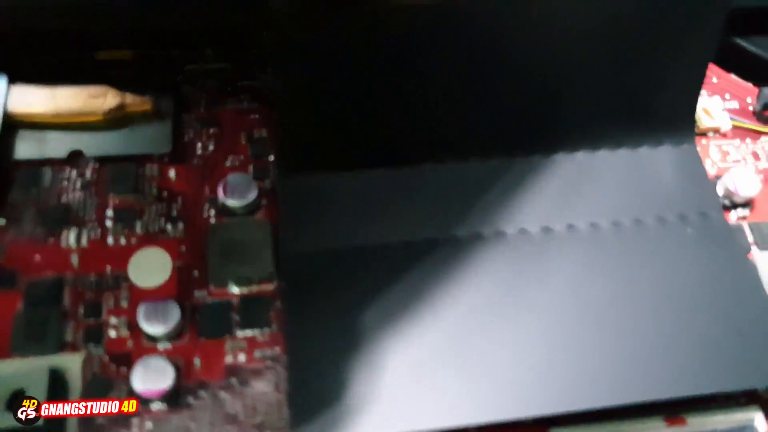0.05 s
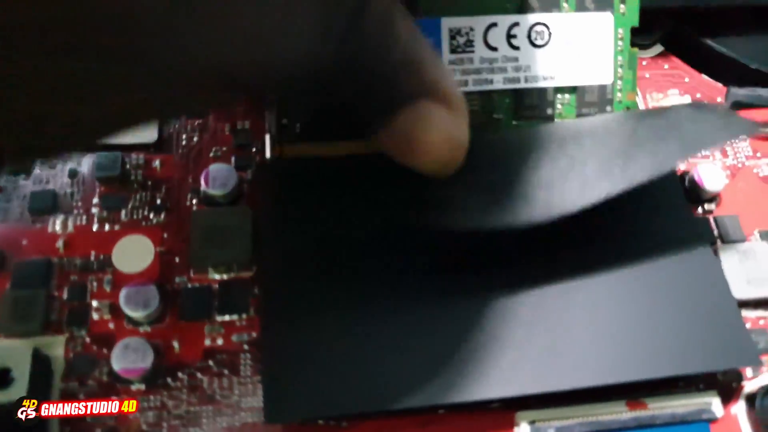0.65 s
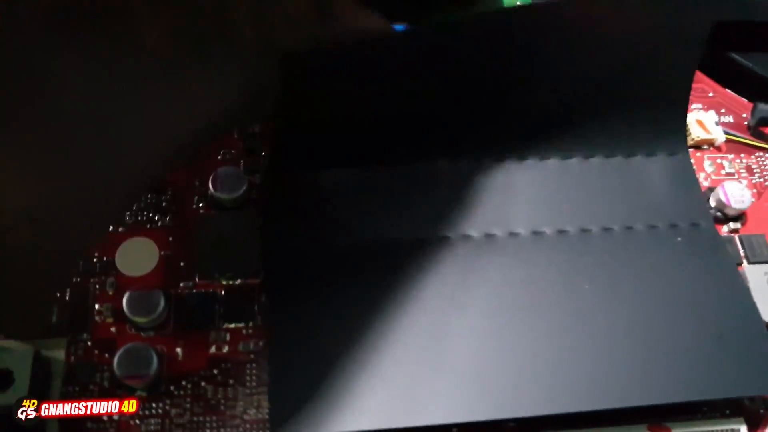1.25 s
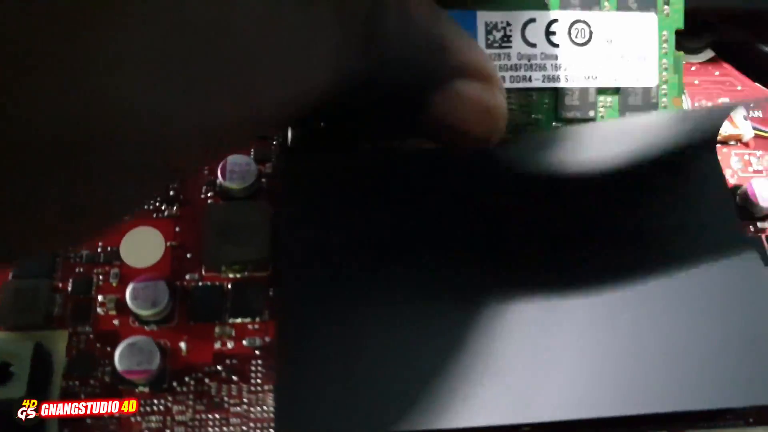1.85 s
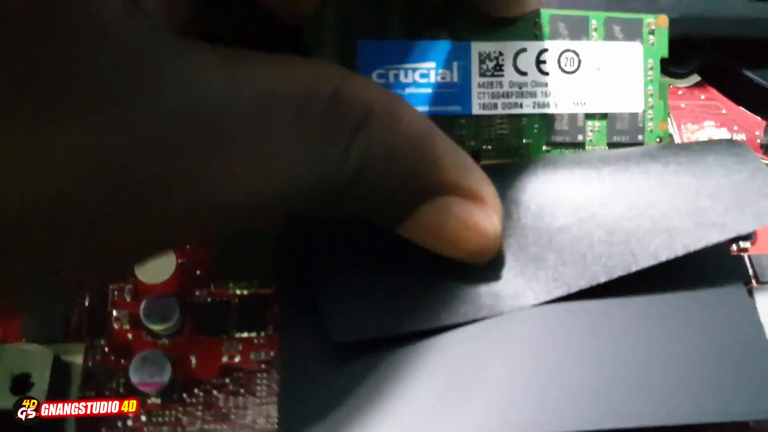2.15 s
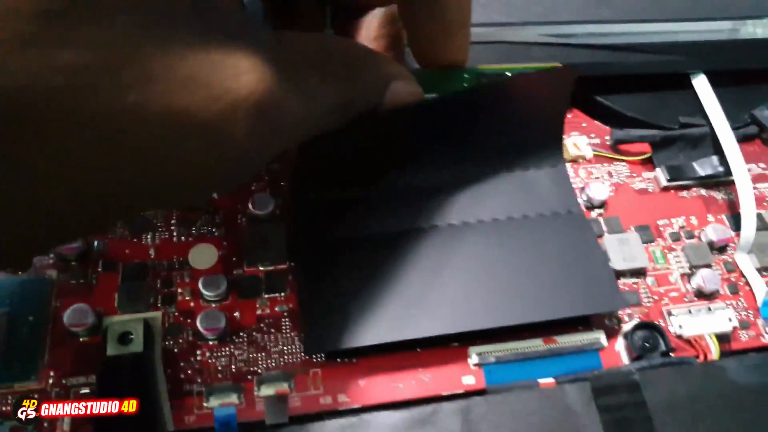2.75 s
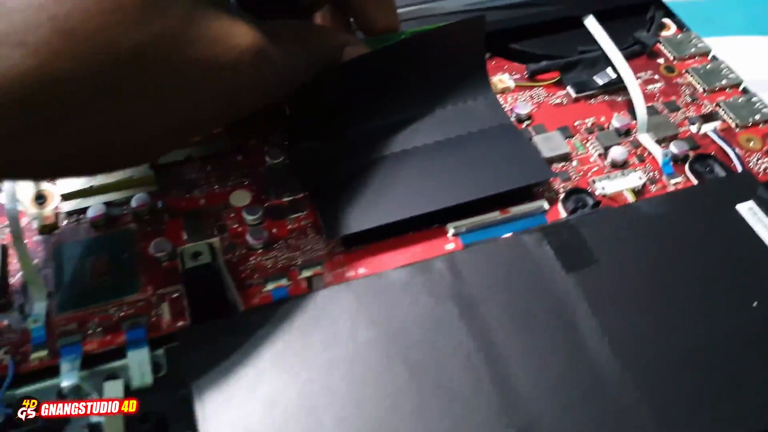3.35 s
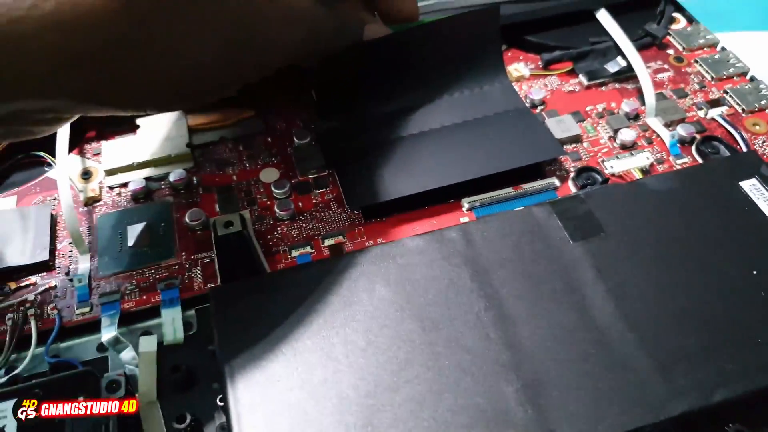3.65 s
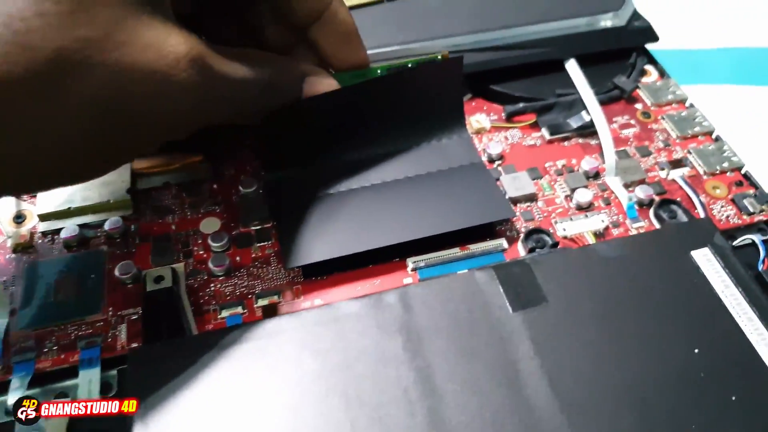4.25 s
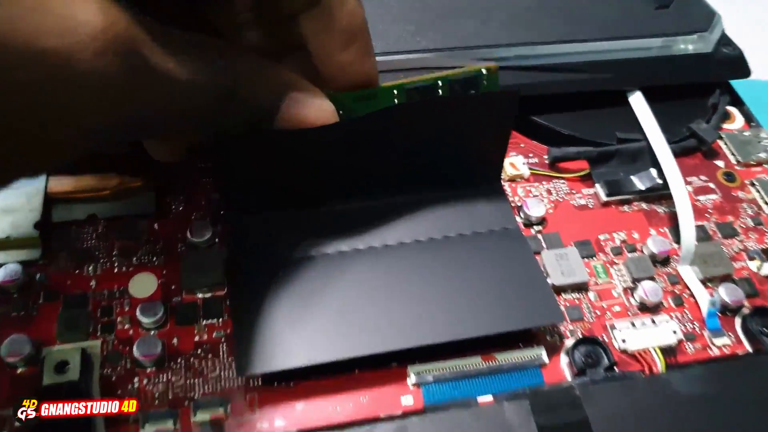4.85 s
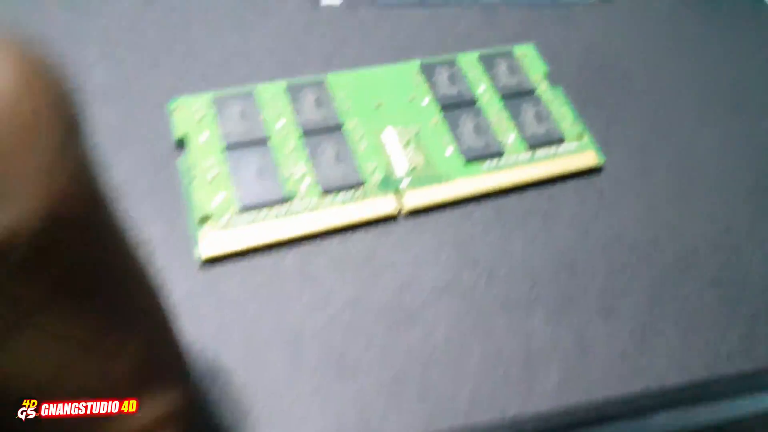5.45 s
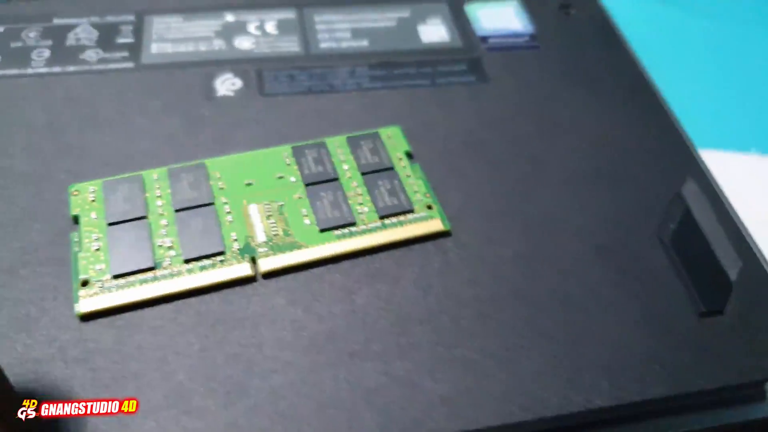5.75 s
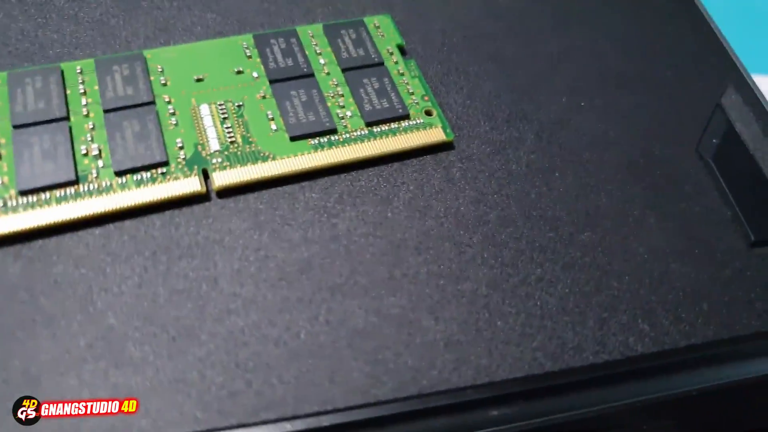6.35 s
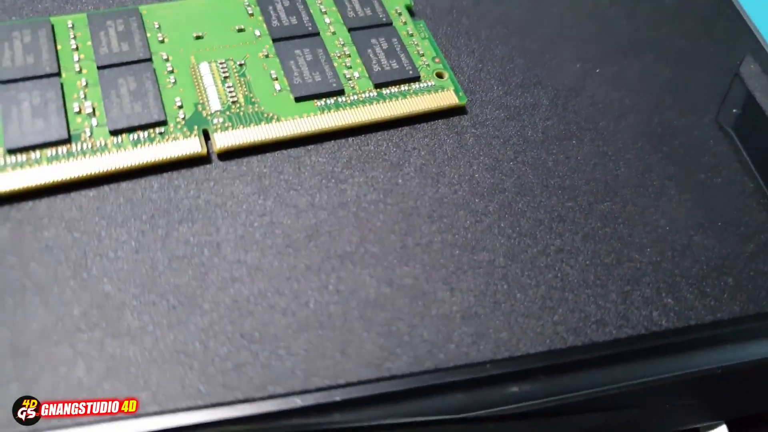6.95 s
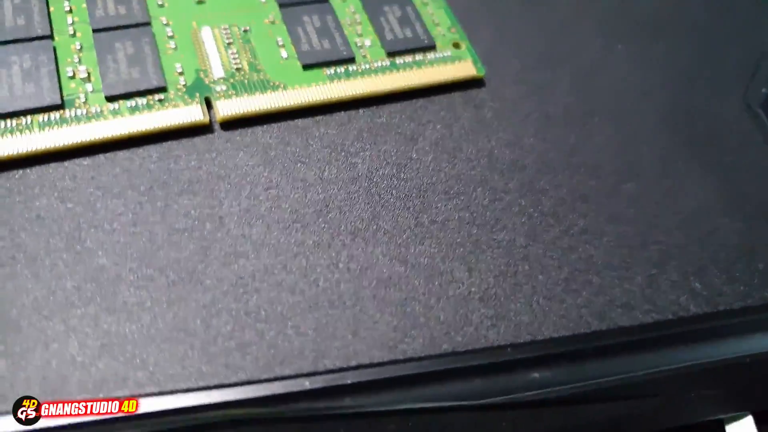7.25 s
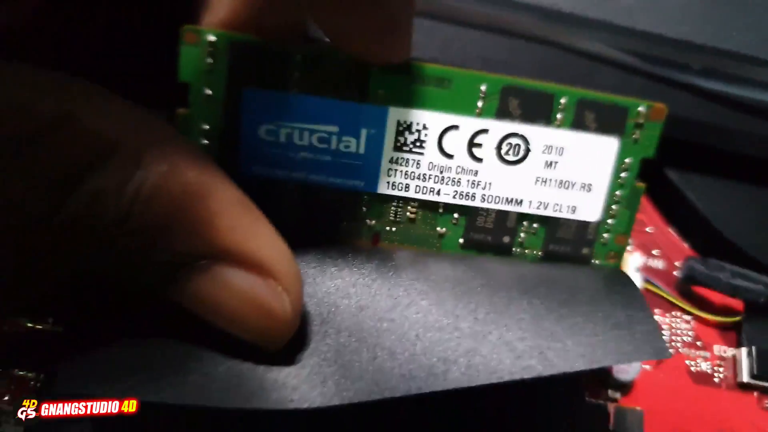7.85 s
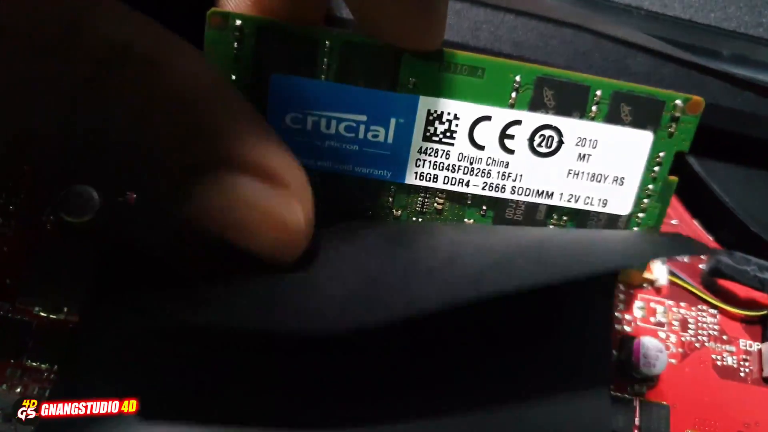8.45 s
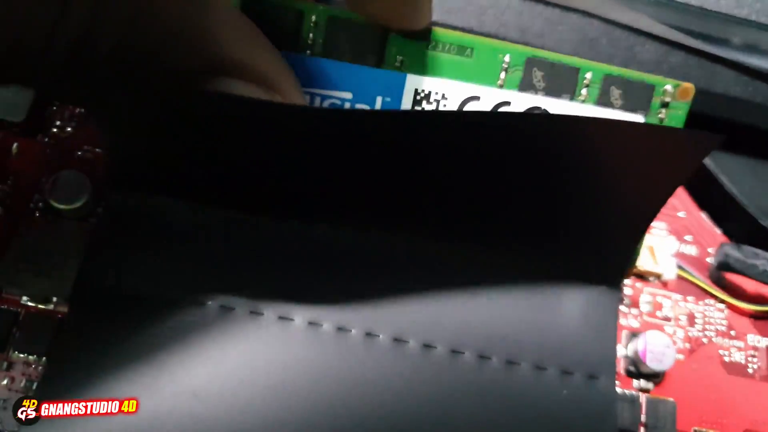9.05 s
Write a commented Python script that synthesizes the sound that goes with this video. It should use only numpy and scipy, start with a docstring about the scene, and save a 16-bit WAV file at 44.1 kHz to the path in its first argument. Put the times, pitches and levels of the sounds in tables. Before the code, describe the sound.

Light knocks and rubs on an open laptop's plastic casing begin the sound. From 0.5 to 1 second a stiff, thin plastic sheet buckles and snaps against a memory module in a flurry of bright clicks. Softer crinkles follow from 1.5 to 2.2 seconds and again around 2.8. It is then quiet, with faint finger brushing and stray ticks, until a small creak at 4.5. Dull knocks and short, grainy rubs come between 5 and 6 seconds. The sharpest knock lands at about 6.6, followed by lighter knocks, creaks and soft thumps until 7.8. More rubs and a knock come between 8 and 8.7, then a small snap and a low puff of air on the left of the microphone at 9. Throughout, the close hand-held microphone carries low handling rumble and faint steady hiss, and a small room adds a short echo.

```python
"""A stiff plastic sheet in an open laptop is bent back and snaps against a memory module: each buckle
is a burst of slips ringing the sheet's bright modes. The casing knocks and creaks in the grip, and
fingers and module slide over plastic in short, grainy rubs. Underneath are soft thumps, the rumble of
the hand through a close hand-held camera and a faint steady hiss. A small room answers the contacts."""
import sys
import numpy as np
from scipy import signal
from scipy.fft import rfft, irfft, next_fast_len
from scipy.io import wavfile
from scipy.ndimage import uniform_filter1d, map_coordinates

SR = 44100
rng = np.random.default_rng(int(sys.argv[2]) if len(sys.argv) > 2 else 0)


def store_wav(level_fs):
    """Save 16-bit WAV to argv[1]."""
    pcm = np.round(np.clip(np.atleast_2d(level_fs), -1, 1) * 32767)
    wavfile.write(sys.argv[1], SR, pcm.T.astype(np.int16))


N = 401751
SIZE, MARGIN = 16384, 2048  # samples in one contact's buffer, and of those before its onset
HIT_SPAN_S = .01  # a hit's energy is spread over this time to set its levels
T = np.maximum(np.arange(SIZE) - MARGIN, 0) / SR  # seconds since the onset
HZ = np.fft.rfftfreq(SIZE, 1 / SR)
GATE = (T > 0) * signal.get_window(("tukey", .2), SIZE)  # opens at the onset

# Edges in Hz of the four bands that voice a contact: body, mid, ring and air.
BAND_EDGES = [300, 1400, 3500, 8000, 16000]
# Snaps of the sheet. Each row: start in seconds, 60 dB decay time in seconds, body, mid, ring and air
# levels in dB, leftward pan in dB.
SHEET_SNAPS = [(0.5158, 0.061, -61, -59, -52, -60, -3.5), (0.565, 0.035, -38.5, -36.5, -17.5, -26.5, -1.5),
               (0.646, 0.03, -38.5, -42.5, -35.5, -41, -0.5), (0.659, 0.042, -44, -44, -43.5, -52, -5),
               (0.6776, 0.045, -34.5, -31, -22, -28, -2), (0.729, 0.045, -42.5, -36, -33, -31, -2),
               (0.7412, 0.042, -39, -25, -18.5, -18, -5.5), (0.7462, 0.035, -38, -47, -19.5, -24.5, 5.5),
               (0.9702, 0.06, -53.5, -55.5, -54.5, -64.5, -2), (1.5106, 0.033, -74, -67, -51.5, -57, -5),
               (1.571, 0.014, -63, -62, -47, -48.5, -6.5), (1.591, 0.025, -65, -60, -42.5, -45, -4.5),
               (1.6558, 0.018, -76, -67, -51.5, -58.5, -4), (1.7056, 0.038, -55, -52.5, -30.5, -39, -4),
               (1.7084, 0.031, -48, -58, -46, -40.5, 3), (1.723, 0.022, -68, -60, -46, -46.5, -2.5),
               (1.8706, 0.03, -51, -58, -36, -41.5, -6), (1.958, 0.047, -38, -34, -27, -34.5, -3.5),
               (2.1416, 0.024, -77, -53.5, -53.5, -57, -1), (2.159, 0.033, -75, -54.5, -56.5, -60, -1),
               (2.6955, 0.054, -61, -46, -48, -46, 1), (2.7495, 0.12, -52, -54, -48.5, -49, -1.5),
               (2.8239, 0.059, -50.5, -41, -33.5, -38.5, -1), (2.851, 0.049, -49, -43.5, -41.5, -48, -3.5),
               (3.188, 0.03, -70, -86.5, -68.5, -61, -5), (4.4255, 0.066, -58.5, -49, -53.5, -68, 0),
               (5.2399, 0.063, -45, -46.5, -43, -43.5, 0.5), (6.0409, 0.04, -60, -56, -47, -48.5, 4),
               (7.046, 0.035, -47, -53, -62.5, -56, -0.5), (8.9177, 0.072, -51.5, -57.5, -50.5, -50, 7.5)]
# Knocks on the casing. Each row: start in seconds, body, mid, ring and air levels in dB, leftward pan
# in dB, chatter in dB.
CASING_KNOCKS = [(0.225, -35, -46.5, -47, -54.5, -1, -7), (0.3342, -41, -51.5, -59, -62, -5.5, -0.5),
                 (0.3643, -38, -39.5, -51.5, -53, -3, -4.5), (0.385, -43, -62.5, -50, -56, 0.5, -12),
                 (1.106, -48.5, -58, -71.5, -72, 4, -0.5), (1.128, -52.5, -50.5, -58, -75.5, -2.5, -4.5),
                 (2.219, -63, -65, -74.5, -71.5, 0, 3), (2.3838, -60, -69, -87, -78, -4, -6),
                 (4.656, -67.5, -66, -63, -64.5, 4, -1), (4.8836, -54.5, -69, -64, -65, 4, 2),
                 (4.9924, -30, -38, -55, -63, 1, -14), (5.3913, -32.5, -40, -76, -47.5, 1, -9.5),
                 (5.396, -44, -51, -61.5, -54.5, 2.5, -8), (6.567, -33.5, -41.5, -36.5, -43, -2.5, -8),
                 (6.575, -23, -31, -36, -26, 5, -9), (6.825, -32, -45, -45, -43, 2, -1.5),
                 (6.8869, -46, -49, -56.5, -51.5, 0.5, 0), (6.9766, -34.5, -42.5, -51.5, -42.5, 3, 9.5),
                 (7.1502, -28.5, -41, -39.5, -31.5, 0, 2.5), (7.1562, -54, -34.5, -52, -40.5, -0.5, -10),
                 (7.2311, -33.5, -41.5, -55, -55, 0.5, -7.5), (7.468, -45, -41, -57.5, -48, 5.5, -7.5),
                 (7.591, -40, -44.5, -49, -55, 7, 14), (7.603, -35, -46, -51.5, -71.5, 2.0, 7),
                 (7.756, -55, -64, -63, -74, 11, 4), (8.1915, -41.5, -64.5, -71, -67, 3, 2.5),
                 (8.6196, -34, -43, -74, -58, 6.5, -8.5), (8.672, -52, -69, -63, -65.5, 4, 0)]
# Sliding strokes. Each row: peak time, rise and fall in seconds, body, mid, ring and air levels in dB,
# leftward pan in dB, lag of the lows in seconds per octave, ratio of crackle to hiss.
RUB_STROKES = [(.09, .05, 0.07, -50.5, -55.5, -54.5, -60, 0, .001, .8),
               (.222, .03, 0.046, -63, -68, -63.5, -62.5, 0.5, .001, .6),
               (.35, .025, 0.06, -48, -55.5, -55, -61, -1.5, .001, 1.2),
               (.65, .06, 0.016, -48.5, -53, -51, -50, -5.5, .001, 1.3),
               (.765, 0.022, 0.074, -53.5, -44.5, -51, -54, -5, .001, .4),
               (1.338, .023, 0.04, -56, -45.5, -45.5, -44, -3, .006, .4),
               (1.385, .03, .06, -61.5, -69, -55, -62.5, -4.5, .001, .4),
               (1.6, 0.038, 0.054, -72.5, -68, -56.5, -61, -1, .001, 6),
               (1.712, 0.033, .07, -60, -60.5, -69, -53.5, 1, .012, 1.3),
               (1.9, .024, 0.07, -61, -61, -58.5, -56, -1, 0.00066, .6),
               (2.02, .062, .1, -52.5, -48, -49, -55, -2, .001, 0.72),
               (2.704, .02, 0.089, -73.5, -65, -61, -64, -1.5, .001, 0.89),
               (2.934, 0.062, 0.15, -58, -59.5, -60.5, -54, -2.5, .001, 0.41),
               (3.06, .06, 0.18, -70, -83.5, -75, -63, -1, .001, .4),
               (3.31, .12, 0.16, -81, -87, -81, -64.5, -0.5, .001, 0.31),
               (3.49, .1, 0.17, -88, -84, -76.5, -69, -0.5, 0.0011, .4),
               (4.41, .08, 0.15, -72.5, -76.5, -76, -73.5, 0, 0.0013, 0.51),
               (4.54, 0.055, 0.088, -60, -59.5, -60, -56, 1.5, .001, .65),
               (4.985, .031, .039, -55, -51, -51, -50.5, 3, 0.0044, .9),
               (5.019, .027, 0.156, -60.5, -67, -74.5, -69, 0, 0.00092, 1),
               (5.195, .08, 0.061, -54.5, -60, -54, -56, 0.5, .001, .9),
               (5.285, .05, 0.05, -50, -46.5, -48, -53.5, -0.5, .001, 1.6),
               (5.385, 0.077, 0.051, -52.5, -57.5, -59, -59.5, -2.5, .001, .9),
               (5.868, .024, 0.039, -53.5, -47.5, -46.5, -49.5, 1, .008, 0.39),
               (5.9, .025, .04, -63, -51.5, -47, -54, -1.5, .003, .7),
               (6.06, .02, 0.14, -61, -56, -58.5, -61.5, 0.5, 0.0011, .4),
               (6.12, .03, .051, -52.5, -48.5, -48, -52.5, 4.5, .001, .35),
               (6.41, 0.055, 0.057, -63.5, -78.5, -80, -69.5, 5, 0.0011, .6),
               (6.559, .016, 0.0175, -56.5, -52, -52, -55.5, 6.5, .006, .4),
               (6.59, 0.011, 0.2, -51, -60, -62, -58, 0, 0.00089, 0.36),
               (6.815, .07, .052, -48.5, -59, -60.5, -67.5, 7, 0.0011, 0.7),
               (6.985, .02, .06, -56, -62, -64.5, -60, 1, .001, .6),
               (7.17, .015, .045, -47, -61, -58.5, -63, 1, .001, .4),
               (7.224, .025, 0.0391, -53.5, -54.5, -55.5, -59, 3, 0.0008, 0.63),
               (7.598, .039, 0.048, -50.5, -61, -58.5, -57, 4.5, .001, 1.3),
               (7.655, 0.049, 0.073, -49.5, -54, -56, -64, 5.5, .001, 0.93),
               (7.799, .03, 0.097, -57, -73, -81, -79, 4.5, 0.00092, 1),
               (8.14, .03, 0.08, -53.5, -53.5, -50, -56, 3, .008, 0.345),
               (8.355, .044, .091, -56, -56, -55, -59, 3, .001, .65),
               (8.58, .045, 0.085, -54, -55, -52, -59, 5, .011, 0.44),
               (8.89, .07, .14, -61, -66.5, -64.5, -64, 4, 0.0011, 1)]
# Friction catching a resonance. Each row: start and end in seconds, first and last pitch in Hz, ratio
# of pitch to bandwidth, level in dB.
CREAKS = [(0.081, 0.138, 534, 558, 6, -46.5), (0.073, .14, 1000, 1120, 4, -53.5),
          (0.326, 0.391, 681, 611, 8.7, -47.5), (0.63, 0.66, 1150, 1183, 8.6, -47),
          (1.346, 1.368, 1000, 437, 3.1, -49), (1.464, 1.65, 4440, 5180, 3.6, -70),
          (1.665, 1.725, 4960, 5320, 3.6, -55), (1.854, 1.932, 5400, 5600, 4.8, -57),
          (1.985, 2.048, 1535, 1510, 12, -49.5), (2.342, 2.683, 924, 1122, 3.04, -71.5),
          (2.352, 2.655, 364.6, 328, 2.4, -64), (2.688, 2.742, 1280, 1247, 4.7, -53),
          (2.921, 2.945, 434, 457, 5, -48.5), (3.437, 3.54, 3550, 3510, 4, -75.5),
          (4.368, 4.416, 732, 764, 5, -67.5), (4.503, 4.579, 1217, 1193, 5.1, -50.5),
          (4.784, 4.86, 1095, 1230, 1.6, -67.5), (5.053, 5.188, 3600, 3470, 81, -67),
          (5.237, 5.273, 379.7, 350, 7.9, -47), (6.049, 6.127, 520, 573, 6.9, -49.5),
          (6.568, 6.584, 1080, 1062, 8, -35), (6.593, 6.67, 800, 722, 3, -54),
          (7.405, 7.44, 2110, 2020, 7, -60), (7.619, 7.726, 507, 458, 3.4, -51.5),
          (8.33, 8.42, 479, 467, 15, -54.5), (8.336, 8.409, 1766, 1636, 3.8, -55.5),
          (8.559, 8.619, 1800, 1595, 4.5, -51.5)]
# Soft low thumps; the last two are puffs of air on the left microphone. Each row: start in seconds,
# pitch in Hz, level in dB, 60 dB decay time in seconds, leftward pan in dB.
LOW_THUMPS = [(.005, 70, -37.5, 0.25, 0), (.237, 69, -34, 0.23, 2), (.37, 71.4, -35.5, 0.12, 2.5),
              (0.573, 187, -30, 0.059, 4), (0.6745, 207, -13, 0.022, 5.5), (0.743, 288.6, -27, 0.03, -1.5),
              (0.876, 78.5, -27.5, 0.13, 1.5), (1.105, 67, -36.5, 0.36, 10), (1.8695, 273, -18, 0.021, 11),
              (1.936, 84.7, -37.5, 0.24, 4), (2.05, 66.6, -35, 0.18, 2), (4.644, 79.5, -41, 0.21, 3),
              (4.993, 73, -38.5, 0.46, 1), (5.556, 69.4, -34.5, 0.18, 3), (5.913, 80, -37, 0.12, 7),
              (6.579, 110, -33, 0.085, 9), (6.806, 69, -28, 0.29, 3.5), (7.172, 69.7, -25, .2, 5),
              (7.611, 68.1, -26, 0.18, 6), (7.231, 217, -33.5, 0.046, 3), (7.796, 101.5, -29, 0.052, 1.5),
              (8.211, 91, -34.5, 0.12, 1), (8.973, 81, -28, 0.5, 45.5), (9.044, 65.5, -22.5, 0.2, 48.5)]
# Resonances of the sheet and of the casing. Each row: frequency in Hz, width in Hz, level in dB.
SHEET_MODES = [(1300, 450, -12), (2090, 99, -14), (2850, 280, -11.5), (4200, 400, -3.5), (4900, 860, 1),
               (5940, 260, -4.5), (8750, 220, -10.5), (9313, 300, -5.5), (10500, 680, -7.5),
               (13180, 210, -15)]
CASING_MODES = [(672, 170, 1), (870, 61, -3), (1117, 130, -1.5), (1476, 170, -3), (2084, 360, -2),
                (2440, 430, -20), (3716, 450, -16), (6096, 680, -19.5), (9640, 2400, -12),
                (11600, 1300, -16)]
# Tone curves of a rub, a thump's dull noise, the grip's rumble, three layers of skin brushing and the
# background hiss. Each row: frequency in Hz, level in dB.
RUB_EQ = [(150, -39), (280, -5), (450, -3), (650, -4), (850, -7), (1200, -0.5), (2200, 3), (3300, -3.5),
          (4400, -4.5), (5800, -11), (7700, -17.5), (9400, -9), (11800, -10.5), (16000, -19.5)]
THUMP_EQ = [(40, -22), (110, 5.5), (190, -6), (300, -21), (700, -48.5), (2000, -100)]
RUMBLE_EQ = [(15, -41.5), (28, -21), (45, 4.5), (68, -4), (100, -1), (135, -9.5), (200, -13), (320, -26.5),
             (600, -45.5), (1500, -100)]
BRUSH_BODY_EQ = [(120, -34), (250, 3.5), (600, -1.5), (1100, -10), (2200, -21.5), (5000, -52)]
BRUSH_RING_EQ = [(800, -17), (2000, 1), (5000, -4), (7500, -10.5), (10000, -31)]
BRUSH_AIR_EQ = [(6000, -31), (8500, -6), (10500, -1), (13000, 0), (16000, -9.5)]
HISS_EQ = [(20, 22), (45, 32), (75, 18.5), (200, 9), (400, 1), (1000, -4.5), (2600, -4), (7500, -19.5),
           (12000, -6), (16000, -10.5)]
# Fader rides for the grip's rumble and the fingers' brushing. Each row: time in seconds, level in dB.
GRIP_RIDE = [(0, -54), (.5, -57), (.8, -54), (1.15, -47), (1.5, -56), (2.0, -54.5), (2.5, -61.5),
             (2.95, -52), (3.3, -62), (4.15, -66), (4.55, -63), (5.0, -55.5), (5.4, -48.5), (5.8, -64.5),
             (6.35, -56), (7.25, -52), (8.0, -55.5), (9.11, -56.5)]
FINGER_RIDE = [(0, -58), (.46, -70), (.72, -53.5), (1.25, -73), (1.9, -62.5), (2.3, -74.5), (2.65, -72),
               (2.95, -64), (3.75, -79.5), (4.3, -76), (4.9, -66), (5.2, -57), (5.72, -73.5), (6.5, -72.5),
               (6.8, -63.5), (7.7, -69.5), (8.0, -74.5), (9.11, -73)]
# The small room's decay. Each row: frequency in Hz, 60 dB decay time in seconds.
ROOM_DECAY = [(150, 0.13), (1000, 0.37), (4000, 0.39), (8000, 0.34), (12000, 0.39)]
# Balance of the two microphone ports. Each row: frequency in Hz, left over right in dB.
PORT_BALANCE = [(60, 6), (250, 10), (700, 8.8), (2200, 9), (5000, 2.5), (10000, 1), (14000, -2.5)]
# Phase between the ports. Each row: frequency in Hz, lead of the left in radians.
PORT_PHASE = [(100, 0.15), (450, 0.89), (900, 1.3), (2000, 2.4), (3300, 1.9), (5000, 1.9), (8000, 0.53),
              (12000, 0)]
# Likeness of the ports. Each row: frequency in Hz, coherence from 0 to 1.
PORT_COHERENCE = [(80, 0.7), (300, 0.71), (900, 0.816), (2500, .27), (5000, 1), (8000, 0.87), (13000, 0.82)]


def sheet_snaps(rise_s=.0005, hold_s=.0053, unrung_db=-11):
    """A faint noise swells just before each snap, then a burst rings the sheet's dense modes."""
    out = np.zeros((2, N))
    tone = causal(eq_gain([(100, -10.5), (300, 2.5), (12000, -5), (16000, -16.5)]))
    for start, t60, *levels_db, pan_db in SHEET_SNAPS:
        buckle = amp(-60 * (np.hypot(T, hold_s) - hold_s) / t60) * (1 - np.exp(-T / rise_s))
        envelope = lead_in(db=-24, t60=.015) + buckle
        sheet = resonate(SHEET_MODES, detune=.008, scatter_db=2) + amp(unrung_db)
        burst = rfft(envelope * rng.standard_normal((2, SIZE)))
        add(out, start, voiced(burst * sheet * tone, levels_db, pan_db, HIT_SPAN_S))
    return out


def sheet_ticks(count=40, spread_db=3, cap_db=-66, t60=.03):
    """Tiny stray contacts tick on the sheet at random, stronger where the fingers are busy."""
    out = np.zeros((2, N))
    busy_db = ride(FINGER_RIDE)
    for moment, strength, brightness in rng.random((count, 3)):
        onset = int(moment * N)
        level_db = min(busy_db[onset], cap_db) + spread_db * (2 * strength - 1)
        slip = rfft(GATE * amp(-60 * T / t60) * rng.standard_normal((2, SIZE)))
        sheet = resonate(SHEET_MODES, detune=.05, scatter_db=4)
        colour_db = np.array([3, -1, -7, -10]) + np.array([-8, -3, 2, 3]) * brightness
        add(out, onset / SR, voiced(slip * sheet, level_db + colour_db, 0, HIT_SPAN_S))
    return out


def casing_knocks(chatter_t60=.044, rattle_t60=.048, unrung_db=-24):
    """One blow rings the damped casing; the contact chatters and loose parts rattle briefly."""
    out = np.zeros((2, N))
    tone = causal(eq_gain([(100, -7), (400, -2), (700, 5), (12500, .5), (16000, -10.5)]))
    for start, *levels_db, pan_db, chatter_db in CASING_KNOCKS:
        chatter = amp(chatter_db - 11 - 60 * T / chatter_t60)
        rattle = amp(-35 - 60 * T / rattle_t60)
        blow = GATE * rng.standard_normal((2, SIZE)) * (chatter + rattle)
        blow[0, MARGIN] += 2  # the impact itself
        swell = rng.standard_normal((2, SIZE)) * lead_in(db=-24, t60=.016)
        casing = resonate(CASING_MODES, detune=.025, scatter_db=2) + amp(unrung_db)
        add(out, start, voiced(rfft(blow + swell) * casing * tone, levels_db, pan_db, HIT_SPAN_S))
    return out


def rubs(casing_db=-1, flutter_db=2):
    """Skin and module slide over matt plastic: fine slips swell and fade, coloured by the casing."""
    out = np.zeros((2, N))
    octaves_down = np.clip(np.log2(3000 / (HZ + 1)), -1, 3)
    for peak, rise, fall, *levels_db, pan_db, lag, crackle in RUB_STROKES:
        speed = np.interp(T, np.cumsum([0, rise, fall]), [0, 1, 0])
        flutter = amp(flutter_db * jitter(smooth_samples=300))
        pressure = np.sin(speed * np.pi / 2) ** 1.4 * (1 + speed) * flutter
        # a slowing stroke hisses in the treble first and in the lows last
        slowing = np.exp(-2j * np.pi * np.cumsum(lag * octaves_down) * HZ[1])
        roughness = patchy(rng.standard_normal((2, SIZE)), depth_db=4.5)
        hiss = rfft(pressure * roughness) * slowing
        slips = rfft(pressure * grains(per_second=1400, spread_db=3))
        casing = resonate(CASING_MODES, detune=.07, scatter_db=3)
        colour = causal(eq_gain(RUB_EQ)) * (1 + amp(casing_db) * casing)
        add(out, peak - rise, voiced((hiss + crackle * slips) * colour, levels_db, pan_db, rise + fall))
    return out


def creaks(pan_db=-2):
    """Uneven sticking and slipping keeps one resonance going: a narrow, gliding band of noise."""
    out = np.zeros((2, N))
    for start, end, first_hz, last_hz, sharpness, db in CREAKS:
        width_hz = first_hz / sharpness
        span = np.clip(end - start, .01, T[-1])
        progress = np.minimum(T / span, 1)
        phase = 2 * np.pi * np.cumsum(first_hz + (last_hz - first_hz) * progress) / SR
        drive = irfft(rfft(rng.standard_normal((2, 2, SIZE))) / (1 + (2 * HZ / width_hz) ** 2))
        swell = np.abs(np.sin(np.pi * progress)) ** .5
        tone = (drive[0] * np.cos(phase) + drive[1] * np.sin(phase)) * swell
        tone = irfft(ports(rfft(tone), HZ, pan_db))
        add(out, start, tone * amp(db) * np.sqrt(span * SR) / np.linalg.norm(tone.mean(0)))
    return out


def thumps(rise_s=.0035, waver_depth=.12, noise_db=-11):
    """A soft low thump swings for a few cycles at a wavering pitch, with a little dull noise."""
    out = np.zeros((2, N))
    for start, hz, db, t60, pan_db in LOW_THUMPS:
        waver = np.exp(waver_depth * jitter(smooth_samples=400))
        swing = np.sin(2 * np.pi * hz * np.cumsum(GATE * waver) / SR)
        noise = unit(irfft(rfft(rng.standard_normal(SIZE)) * eq_gain(THUMP_EQ)))
        envelope = amp(db - 60 * T / t60) * (1 - np.exp(-T / rise_s))
        sides = amp([[pan_db / 2], [-pan_db / 2]])
        add(out, start, (swing + amp(noise_db) * noise) * envelope * sides / sides.mean())
    return out


def grip_rumble(effort, effort_db=-2, lumps_db=2):
    """The moving hand rumbles through the camera in lumps, swelling around every stroke."""
    rumble = stereo_noise(RUMBLE_EQ, pan_db=-5)
    power = np.abs(uniform_filter1d(rumble.mean(0) ** 2, size=3000))
    evened = rumble / np.sqrt(power + .037)
    lumps = amp(lumps_db * wobble(knots_per_s=14))
    return evened * lumps * np.hypot(amp(ride(GRIP_RIDE)), amp(effort_db) * effort)


def finger_brushing(effort, effort_db=-13.5):
    """Skin brushes faintly over the parts, swelling around every stroke."""
    body = amp(-2) * patchy(stereo_noise(BRUSH_BODY_EQ, pan_db=.5), depth_db=4)
    ring = amp(-6) * stereo_noise(BRUSH_RING_EQ, pan_db=-1.5)
    air = amp(-8) * stereo_noise(BRUSH_AIR_EQ, pan_db=2)
    return (body + ring + air) * np.hypot(amp(ride(FINGER_RIDE)), amp(effort_db) * effort)


def background_hiss(level_db=-64.5):
    """A faint, steady bed of noise, heavy in the lows."""
    return amp(level_db) * stereo_noise(HISS_EQ, pan_db=-4)


def room(send, crossfeed=.027):
    """The small room returns a diffuse tail; every frequency dies at its own speed."""
    hz, t, noise = signal.stft(rng.standard_normal((2, SR // 2)), SR, nperseg=256)
    colour_db = along([(200, .5), (1000, 2), (2200, 2), (5000, -2.5), (8000, 0), (12000, -.5)], hz)
    decay = amp(colour_db[:, None] - 60 * t / along(ROOM_DECAY, hz)[:, None])
    tail = signal.istft(noise * decay, SR, nperseg=256)[1]
    tail = np.pad(tail / np.linalg.norm(tail[0]), ((0, 0), (SR // 200, 0)))  # 5 ms pre-delay
    tail = tail + crossfeed * tail[::-1]  # the two ports sit close and share part of the tail
    return signal.fftconvolve(send.mean(0)[None], tail, axes=1)[:, :N] * amp([[1], [-1]])


def hand_effort(gather_t60=.28, ebb_t60=.25):
    """The hand's effort, as a gain: it gathers before each stroke and ebbs after it."""
    t = np.arange(0, N, 64) / SR
    power = sum(amp(body_db - 60 * np.maximum((peak - t) / gather_t60, (t - peak) / ebb_t60)) ** 2
                for peak, _, _, body_db, *_ in RUB_STROKES)
    return np.sqrt(np.interp(np.arange(N) / SR, t, power))


def resonate(modes, detune, scatter_db):
    """Response of a body; each contact point stirs the modes a little differently."""
    hz, width, db = np.transpose(modes)[:, :, None]
    shift, level = rng.standard_normal((2, len(modes), 1))
    hz = hz * np.exp(detune * shift)
    damping = 1j * HZ * width
    return np.sum(amp(db + scatter_db * level) * damping / (hz ** 2 - HZ ** 2 + damping), 0)


def ports(pair, hz, pan_db):
    """Two unrelated spectra become the partly alike left and right of the microphone ports."""
    spread = np.arccos(np.clip(along(PORT_COHERENCE, hz), -1, 1)) / 2
    mid, side = pair[0] * np.cos(spread), pair[1] * np.sin(spread)
    lean = amp((along(PORT_BALANCE, hz) + pan_db) / 2) * np.exp(.5j * along(PORT_PHASE, hz))
    return np.array([(mid + side) * lean, (mid - side) / lean])


def voiced(pair, levels_db, pan_db, span):
    """Place a contact in stereo and EQ it toward its four band levels over span seconds."""
    spectrum = ports(pair, HZ, pan_db)
    bands = list(zip(BAND_EDGES, BAND_EDGES[1:]))
    centres = np.sqrt(np.prod(bands, axis=1))
    for _ in range(2):
        power = np.abs(spectrum.mean(0)) ** 2 * 2 / (SIZE * span * SR)
        now_db = 10 * np.log10([power[(HZ >= lo) & (HZ < hi)].sum() + 1e-20 for lo, hi in bands])
        spectrum = spectrum * causal(eq_gain(np.c_[centres, levels_db - now_db]))
    return irfft(spectrum)


def causal(gain):
    """The minimum-phase response with this gain: it rings only after it is struck."""
    cepstrum = irfft(np.log(np.maximum(gain, 1e-6)))
    cepstrum[1:SIZE // 2] *= 2
    cepstrum[SIZE // 2 + 1:] = 0
    return np.exp(rfft(cepstrum))


def stereo_noise(eq, pan_db):
    """Coloured stereo noise whose middle has rms 1."""
    size = next_fast_len(N)
    hz = np.fft.rfftfreq(size, 1 / SR)
    spectrum = ports(rfft(rng.standard_normal((2, size))), hz, pan_db)
    noise = irfft(spectrum * eq_gain(eq, hz), size)[:, :N]
    return noise / noise.mean(0).std()


def patchy(x, depth_db):
    """Resonances come and go as the contact moves across the surface."""
    frames = signal.stft(x, nperseg=512)[2]
    patches = uniform_filter1d(rng.standard_normal(frames.shape[1:]), size=4, axis=0)
    patches = uniform_filter1d(patches, size=6, axis=1)
    return signal.istft(frames * amp(depth_db * unit(patches)), nperseg=512)[1][:, :x.shape[1]]


def grains(per_second, spread_db):
    """Two streams of tiny slips of uneven size, rms 1."""
    slips = rng.random(SIZE) < per_second / SR
    return unit(slips * amp(spread_db * rng.standard_normal(SIZE)) * rng.standard_normal((2, SIZE)))


def lead_in(db, t60):
    """Envelope of a faint noise that swells up to the onset of a contact."""
    before = np.maximum(MARGIN - np.arange(SIZE), 0) / SR
    return (before > 0) * amp(db - 60 * before / t60)


def jitter(smooth_samples):
    """Random unsteadiness within one contact, rms 1."""
    return unit(uniform_filter1d(rng.standard_normal(SIZE), size=smooth_samples))


def wobble(knots_per_s):
    """A smooth random curve across the scene."""
    knots = rng.standard_normal(int(N * knots_per_s / SR) + 4)
    return map_coordinates(knots, [np.arange(N) * knots_per_s / SR])


def add(track, start, sound):
    """Mix in a contact with faded edges, its onset at start seconds."""
    i = round(start * SR) - MARGIN
    part = (sound * signal.get_window(("tukey", .1), SIZE))[:, max(-i, 0):N - i]
    track[:, max(i, 0):][:, :part.shape[1]] += part


def ride(points):
    """A fader ride in dB, one value per sample."""
    return np.interp(np.arange(N) / SR, *np.transpose(points))


def along(points, hz):
    """Join (Hz, value) points on a log frequency axis."""
    knots_hz, values = np.transpose(points)
    return np.interp(np.log(hz + 1), np.log(knots_hz + 1), values)


def eq_gain(points, hz=HZ):
    """Gain of a tone curve of (Hz, dB) points."""
    return amp(along(points, hz))


def amp(db):
    """Decibels to gain."""
    return 10 ** (np.asarray(db) / 20)


def unit(x):
    """Scale to rms 1."""
    return x / np.sqrt(np.mean(x ** 2) + 1e-20)


def scene():
    """Sheet, casing and fingers in the room, over dry thumps, handling noise and hiss."""
    sheet = sheet_snaps() + sheet_ticks()
    casing = casing_knocks()
    sliding = rubs() + creaks()
    effort = hand_effort()
    bed = thumps() + grip_rumble(effort) + finger_brushing(effort) + background_hiss()
    send = amp(-12.5) * sheet + amp(-11.5) * casing + amp(-10.5) * sliding
    return sheet + casing + sliding + bed + room(send)


def record(dry):
    """The camera rounds off the hardest peaks and keeps nothing above its band limit."""
    ceiling, knee, top_hz = .72, 4, 15900
    size = next_fast_len(N + SIZE)
    rounded = dry / (1 + np.abs(dry / ceiling) ** knee) ** (1 / knee)
    passband = np.fft.rfftfreq(size, 1 / SR) < top_hz
    return irfft(rfft(rounded, size) * passband, size)[:, :N]


dry = scene()
out = record(dry)
store_wav(out)
```